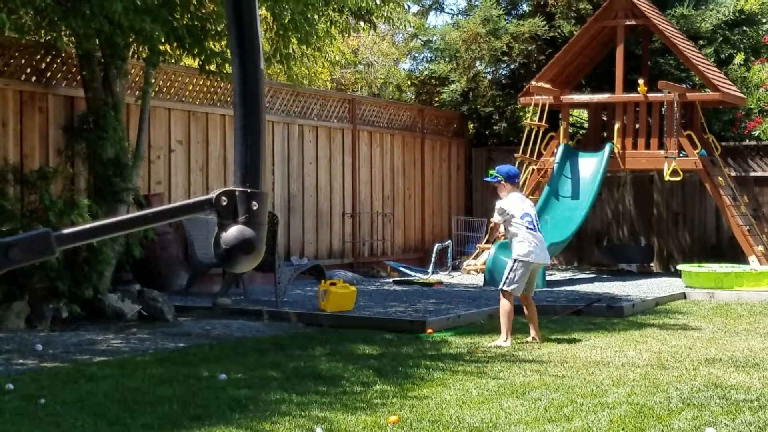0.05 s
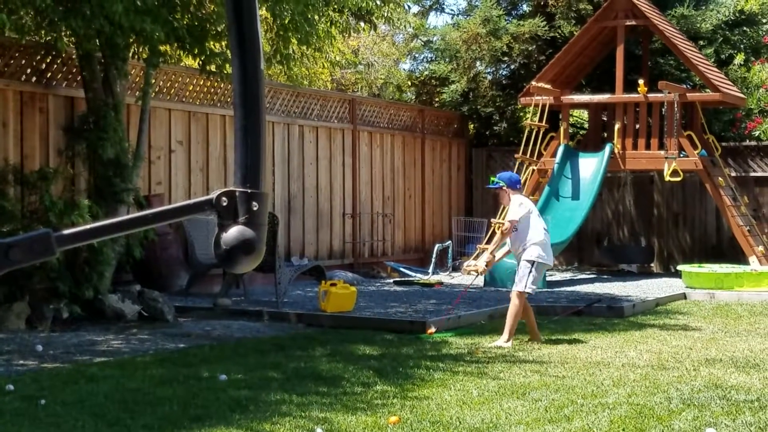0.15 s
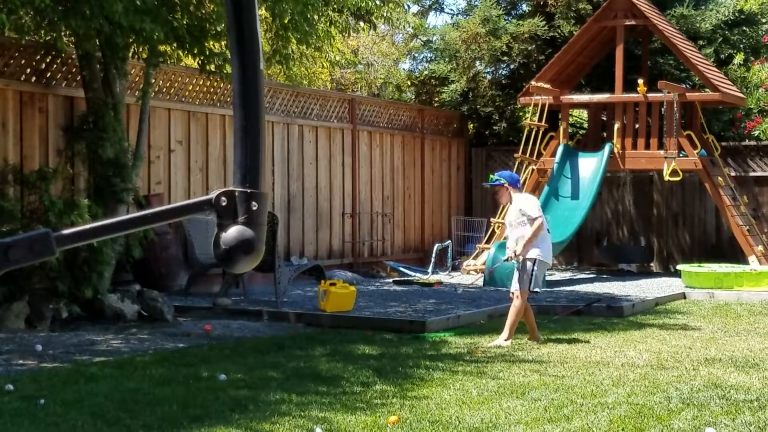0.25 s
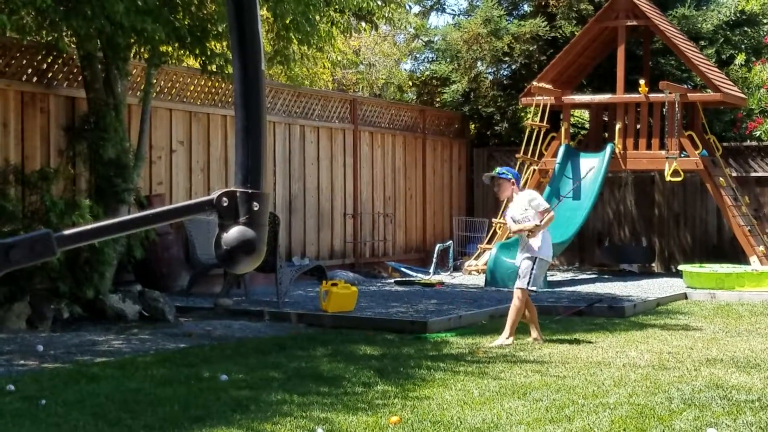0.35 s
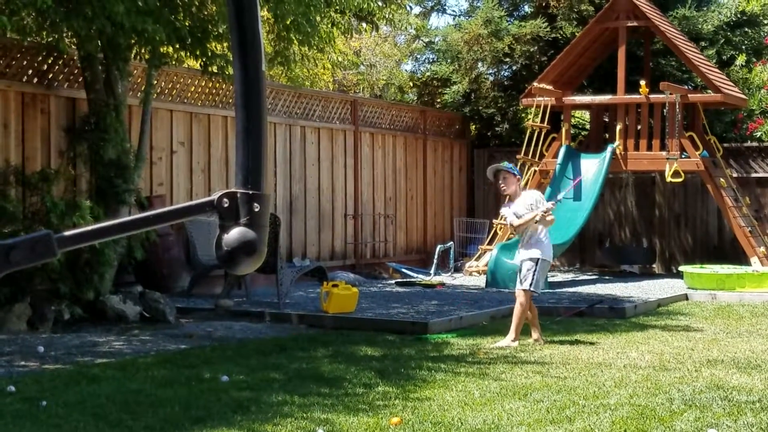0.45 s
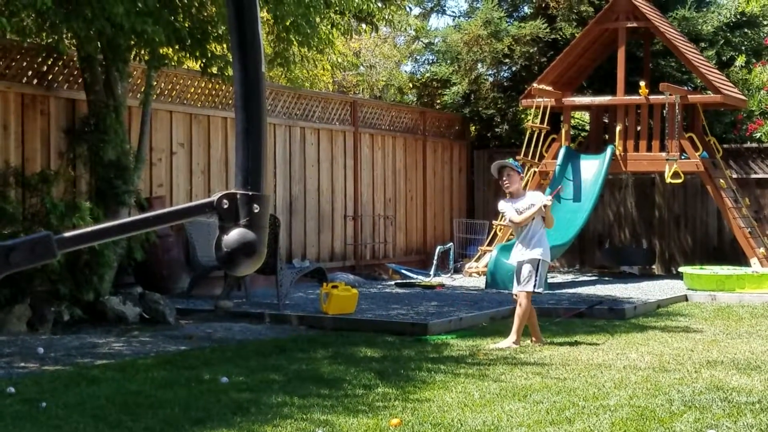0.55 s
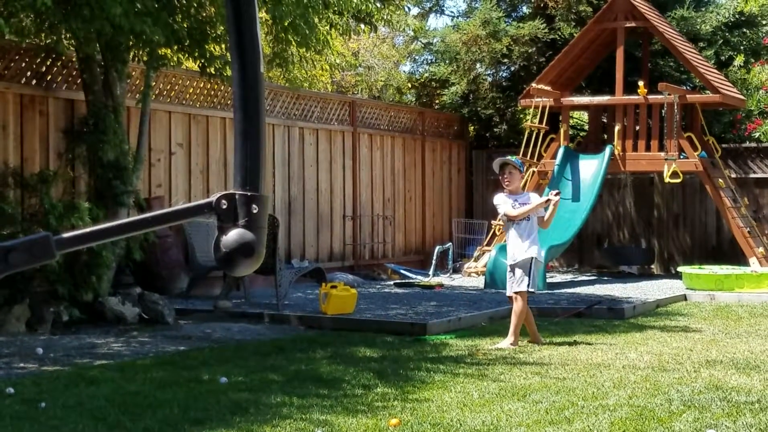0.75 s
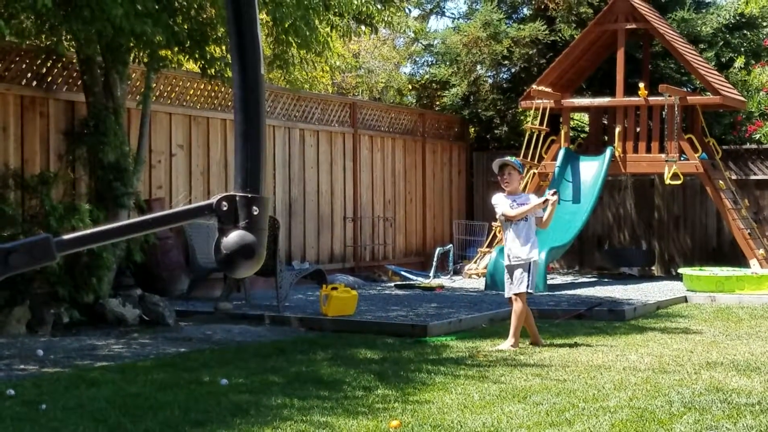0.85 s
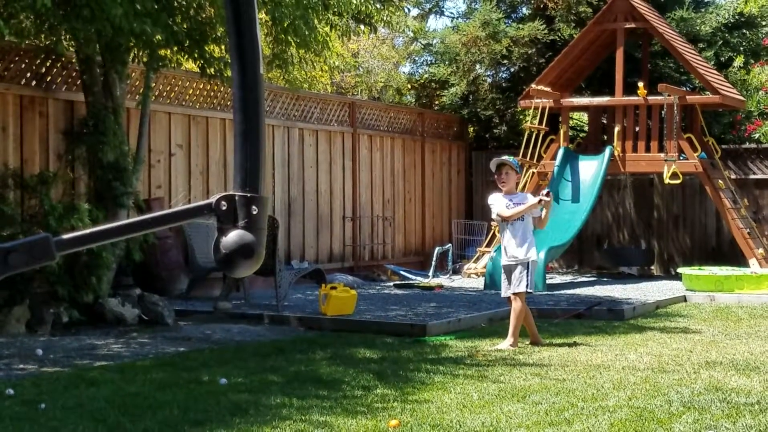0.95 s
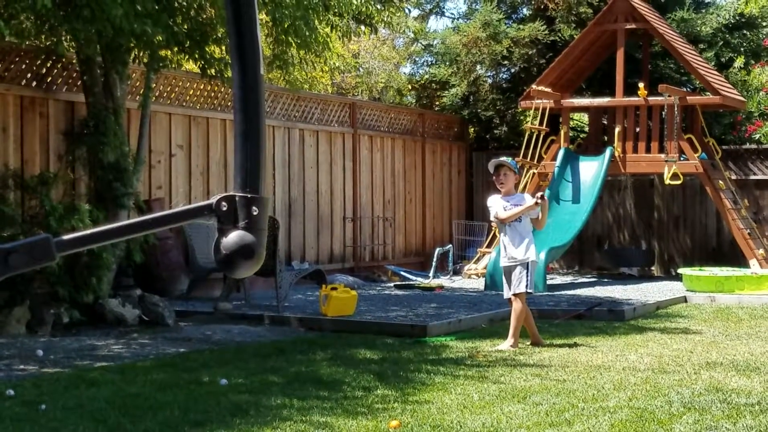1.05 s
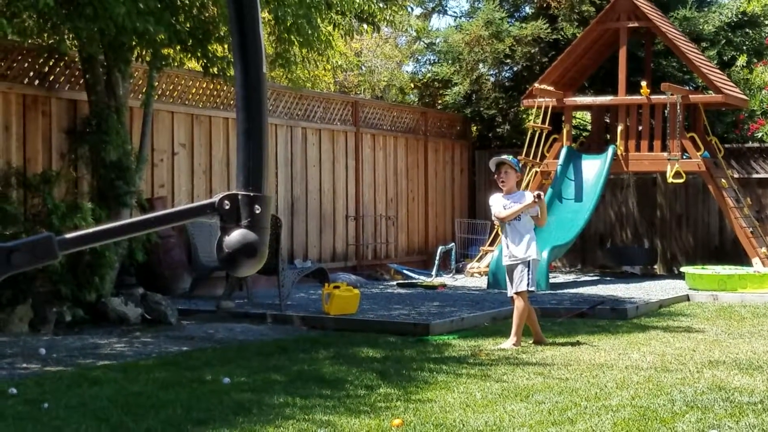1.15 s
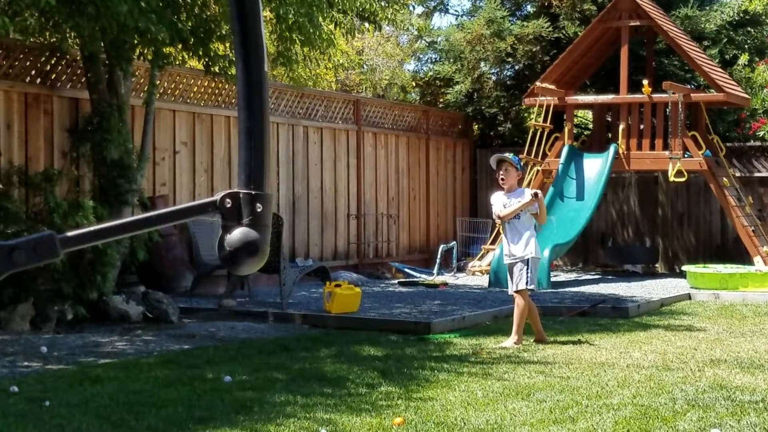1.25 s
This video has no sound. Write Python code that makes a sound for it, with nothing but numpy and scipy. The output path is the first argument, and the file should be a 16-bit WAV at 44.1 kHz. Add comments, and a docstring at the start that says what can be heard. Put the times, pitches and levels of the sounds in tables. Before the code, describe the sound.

One loud, hollow crack of a bat hitting a ball bounces off a garden fence. Much quieter and farther off, the ball rustles through foliage, clatters on wood and lands softly, with a faint outdoor rumble underneath.

```python
"""A hollow ball, batted by a child in a fenced backyard, gives a double thump with a crack and a scuff.
The impact excites damped resonances, and fence and house reflect the sound. The ball then brushes
leaves and twigs, knocks on wooden boards, which ring in their normal modes, and drops through the
foliage to the ground. A low neighbourhood rumble lies underneath."""
import sys
import numpy as np
from scipy import signal
from scipy.fft import rfft, irfft, next_fast_len
from scipy.io import wavfile
from scipy.ndimage import map_coordinates

SR = 44100
rng = np.random.default_rng(int(sys.argv[2]) if len(sys.argv) > 2 else 0)


def persist_wave(psi):
    """Save psi, clipped to +-1, as 16-bit WAV."""
    counts = np.round(np.clip(psi, -1, 1) * 32767).astype(np.int16)
    wavfile.write(sys.argv[1], SR, np.atleast_2d(counts).T)


N = 57330

# spectrum of the neighbourhood rumble (f/Hz, level/dB)
RUMBLE_SPECTRUM = [(15, -46), (25, -25), (44, -9.5), (79, -11), (100, -5.5), (118, 1), (145, -8.5),
                   (190, -7), (235, -8), (290, -13.5), (445, -18), (630, -17), (870, -18.5), (2000, -28.5),
                   (3530, -36), (7700, -45.5), (15500, -38)]
# hollow resonances of bat and ball (t/s, f/Hz, peak level/dB, time to peak/s)
THUMPS = [(.2361, 587, -17, 0.0017), (.2431, 211, -20, 0.0043), (.2458, 606, -14.5, 0.0014),
          (.2425, 127, -57, 0.0027)]
# cracks of the blow and their reflections off the walls (t/s, level/dB, T60/s, left-right/dB)
CRACKS = [(0.2372, -36, 0.035, -8.5), (0.2431, -20.5, 0.014, 3), (0.2554, -23, 0.0054, -2.5),
          (0.286, -24.5, 0.0089, 10), (0.292, -25.5, 0.023, -10.5), (.298, -31.5, 0.042, 6.5),
          (.319, -39.5, 0.045, -4), (0.334, -47.5, .04, -14)]
CRACK_SPECTRUM = [(60, -38), (300, -9.5), (700, 1), (1200, -3.5), (1900, 1), (2400, -9), (3050, -23.5),
                  (6000, -44), (15500, -31)]  # (f/Hz, level/dB)
# scuff of ball on bat, and its scatter (t/s, level/dB, rise/s, T60/s)
SCUFFS = [(0.235, -37.5, 0.0011, 0.12), (.2406, -27, .0015, 0.024), (0.245, -42, 0.0016, 0.28)]
SCUFF_SPECTRUM = [(500, 5.5), (2000, -7.5), (3800, -1), (5500, -4.5), (8000, -3.5), (9400, 1),
                  (12500, -5.5), (15000, -5)]  # (f/Hz, level/dB)
# yard reverberation after the blow (t/s, level/dB, rise/s, T60/s)
YARD_REVERB = [(0.248, -25.5, 0.0062, 0.27), (0.282, -33.5, 0.0015, 0.26)]
YARD_SPECTRUM = [(40, -36), (80, -19), (130, -6), (180, 3), (280, 1.5), (400, 0), (560, -6), (740, -8),
                 (1000, -1.5), (1400, -13), (2100, -10), (3000, -23.5), (6000, -33), (15500, -49)]  # (f/Hz, level/dB)
# late echo from neighbouring gardens (f/Hz, level/dB)
ECHO_SPECTRUM = [(60, -48), (150, 7), (400, -10.5), (750, -0.5), (1100, -3), (1400, -5), (2100, -2),
                 (2500, -10.5), (3050, -20), (6000, -30.5), (15500, -36)]
# brushed leaves (t/s, level/dB, rise/s, T60/s)
RUSTLES = [(0.825, -58, 0.002, 0.69), (0.919, -49, 0.00087, 0.16), (0.978, -42.5, 0.013, 0.17),
           (.991, -46.5, 0.0023, 0.12), (1.002, -54, 0.0024, 0.41), (1.255, -64.5, 0.011, 0.22)]
LEAF_SPECTRUM = [(300, -37), (1500, 3), (2100, 11), (2750, 8), (3300, 1), (4800, -0.5), (7000, -7.5),
                 (9500, -4), (12500, -4.5), (15000, -3)]  # (f/Hz, level/dB)
# struck twigs (t/s, level/dB, T60/s)
TWIGS = [(0.8295, -48, 0.088), (.8445, -57, 0.086), (0.9892, -50, 0.094)]
TWIG_SPECTRUM = [(300, -26), (1000, -5), (1800, -3), (2080, 5.5), (2300, -1), (2700, -1), (3050, -11),
                 (4600, -7), (7000, -16), (15000, -8)]  # (f/Hz, level/dB)
# impacts on wood (t/s, level/dB, relative crack level/dB, left-right/dB)
KNOCKS = [(.9112, -39.5, 7, 0), (0.9208, -38, 2.5, 2), (.939, -38.5, -9, -0.5), (.992, -53, 5, 5),
          (1.018, -50.5, -7, -8)]
# normal modes of the boards (f/Hz, relative level/dB, T60/s)
BOARD_MODES = [(191, -4, 0.21), (252.3, 9, 0.077), (307, 2, .2), (393.7, -5, 0.32), (502.6, 1, 0.16),
               (609.6, -4, 0.14), (764, -4.5, 0.067), (1479, 6, 0.058), (1586, -9, 0.096),
               (2000, -26, 0.043), (2400, -6, 0.024), (2810, -6.5, 0.11), (3100, -13, 0.12),
               (4200, -21, 0.036)]
# contact crack and reverberation of a knock (f/Hz, level/dB)
KNOCK_CRACK_SPECTRUM = [(60, 7), (150, 9), (450, 3.5), (700, -7), (1100, -12), (1500, 8), (1850, -4.5),
                        (2400, 5), (2800, 1), (3450, -18), (4100, -7), (5300, -22), (9000, -19),
                        (15000, -23)]
KNOCK_REVERB_SPECTRUM = [(60, -15), (150, 2), (400, 1), (620, -1.5), (850, -2.5), (1150, -6.5), (1500, -4),
                         (1800, -6.5), (2300, -12), (2800, -12), (3400, -21), (6000, -25.5), (15500, -37)]
# thuds on the ground, then a faint ring (t/s, f/Hz, peak level/dB, time to peak/s)
THUDS = [(0.97, 114.2, -46, 0.025), (1.024, 111.7, -50, 0.032)]
RINGS = [(1.125, 897, -60, 0.033)]
# likeness of the left and right channels (f/Hz, coherence)
COHERENCE = [(60, 1), (200, 0.94), (500, 0.66), (1000, 0.12), (2000, 0.083), (5000, 0.05), (15000, 0.03)]
# channel balance (f/Hz, left-right/dB)
BALANCE = [(60, -3), (200, -1.6), (600, -1.5), (1200, -3.5), (2300, -1.5), (4400, 1.7), (15000, 1.5)]


def amp(db):
    """Amplitude ratio of a level in decibels."""
    return 10 ** (np.asarray(db) / 20)


def unit_rms(x):
    """Normalisation to an rms of 1."""
    return x / np.sqrt(np.mean(x ** 2) + 1e-20)


def curve_at(points, hz):
    """Interpolation of (f/Hz, value) points on a logarithmic frequency axis."""
    f, values = np.transpose(points)
    return np.interp(np.log(hz + 1), np.log(f + 1), values)


def since(onset):
    """Seconds elapsed since the onset, zero before it."""
    return np.maximum(np.arange(N) / SR - onset, 0)


def pan(db):
    """Left and right gains for an interchannel level difference."""
    return amp(np.array([[db], [-db]]) / 2)


def filtered(x, response):
    """Linear filtering: the spectrum is multiplied by a frequency response."""
    size = next_fast_len(N + SR // 2)
    return irfft(rfft(x, size) * response(np.fft.rfftfreq(size, 1 / SR)), size)[..., :N]


def stereo_angle(hz):
    """Mid-side mixing angle; the cosine of twice this angle is the coherence."""
    return np.arccos(np.clip(curve_at(COHERENCE, hz), -1, 1)) / 2


def noise(spectrum):
    """Partially coherent stereo noise of rms 1, near mono in the bass and wide in the treble."""
    def response(hz):
        angle = stereo_angle(hz)
        return amp(curve_at(spectrum, hz)) * [np.cos(angle), np.sin(angle)]
    mid, side = filtered(rng.standard_normal((2, N)), response)
    return unit_rms(np.array([mid + side, mid - side]))


def burst(spectrum, onset, db, rise, t60):
    """Coloured noise with exponential build-up and decay."""
    t = since(onset)
    return noise(spectrum) * (1 - np.exp(-t / rise)) * amp(db - 60 * t / t60)


def resonance(onset, hz, db, time_to_peak):
    """A damped oscillator, softly driven: its amplitude builds to a peak and dies away."""
    t = since(onset)
    u = t / time_to_peak
    return -amp(db) * (u * np.exp(1 - u)) ** 2 * np.sin(2 * np.pi * hz * t)


def minimum_phase(spectrum, size=2048):
    """Causal impulse response of unit energy, obtained by folding the cepstrum."""
    gain = amp(curve_at(spectrum, np.fft.rfftfreq(size, 1 / SR)))
    cepstrum = irfft(np.log(gain))
    cepstrum[1:size // 2] *= 2
    cepstrum[size // 2 + 1:] = 0
    response = irfft(np.exp(rfft(cepstrum)))
    return response / np.linalg.norm(response)


def impact(spectrum, onset, db, t60):
    """Source and filter: a brief noisy force is convolved with a body's impulse response."""
    t = since(onset)
    decay = amp(-60 * t / t60) * (t > 0)
    force = noise([(1, 0), (SR, 0)]) * decay  # flat spectrum
    vibration = signal.fftconvolve(force, minimum_phase(spectrum)[None], axes=1)[:, :N]
    return amp(db) * unit_rms(vibration) * np.sqrt(np.mean(decay ** 2))


def neighbourhood():
    """Stationary background noise: distant rumble and faint hiss."""
    return noise(RUMBLE_SPECTRUM) * amp(-56.5)


def bat():
    """Impact excitation: bat and hollow ball resonate, the contact cracks and friction scuffs."""
    thump = sum(resonance(*row) for row in THUMPS)
    crack = sum(pan(lr) * impact(CRACK_SPECTRUM, onset, db, t60) for onset, db, t60, lr in CRACKS)
    scuff = sum(burst(SCUFF_SPECTRUM, *row) for row in SCUFFS)
    return thump + crack + scuff


def yard():
    """Reverberation: fence and house scatter the blow; longer paths from other gardens arrive later."""
    near = sum(burst(YARD_SPECTRUM, *row) for row in YARD_REVERB)
    return near + burst(ECHO_SPECTRUM, onset=0.31, db=-39.5, rise=0.0064, t60=0.52)


def foliage(grain_db=3, grain_hz=700):
    """Friction and small impacts: leaves rustle and twigs tick, grainy with random amplitude modulation."""
    leaves = sum(burst(LEAF_SPECTRUM, *row) for row in RUSTLES)
    twigs = sum(burst(TWIG_SPECTRUM, onset, db, rise=0.0012, t60=t60) for onset, db, t60 in TWIGS)
    knots = rng.standard_normal(int(N * grain_hz / SR) + 4)
    grain = map_coordinates(knots, [np.arange(N) * grain_hz / SR])
    return (leaves + twigs) * unit_rms(amp(grain_db * grain))


def boards(onset, count=5, mistuning=0.0248, rise_cycles=0.74):
    """Modal superposition: each mode differs slightly in frequency by board, and in phase by ear."""
    out = np.zeros((2, N))
    ringing = slice(int(onset * SR), int((onset + 0.3) * SR))
    t = since(onset)[ringing, None]
    for hz, db, t60 in BOARD_MODES:
        detune, start_phase, spread = rng.standard_normal((3, count))
        phase = 2 * np.pi * (hz * (1 + mistuning * detune) * t + start_phase)
        ear_shift = stereo_angle(hz) * spread
        envelope = amp(db - 60 * t / t60) * (1 - np.exp(-t * hz / rise_cycles)) / np.sqrt(count)
        out[:, ringing] += [(envelope * np.sin(phase + side * ear_shift)).sum(axis=1) for side in (1, -1)]
    return out


def knocks():
    """Impulsive excitation: each contact cracks, sets the boards ringing and reverberates in the yard."""
    out = np.zeros((2, N))
    for onset, db, crack_db, lr in KNOCKS:
        crack = impact(KNOCK_CRACK_SPECTRUM, onset, crack_db, t60=0.03)
        reverb = burst(KNOCK_REVERB_SPECTRUM, onset, db=-10, rise=0.013, t60=0.67)
        out += amp(db) * pan(lr) * (amp(-6) * boards(onset) + crack + reverb)
    return out


def landing():
    """A soft impact excites only low frequencies: the ball thuds on the ground."""
    return sum(resonance(*row) for row in THUDS)


def faint_ring():
    """A single damped resonance lingers after the landing."""
    return sum(resonance(*row) for row in RINGS)


def scene():
    """Linear superposition of the ball's sounds and the background."""
    return bat() + yard() + knocks() + foliage() + landing() + faint_ring() + neighbourhood()


def record(dry, low_cut_hz=48, top_hz=15900):
    """Band-limited microphone response, favouring the right in bass and middle, the left in the treble."""
    def response(hz):
        return amp(curve_at(BALANCE, hz) * np.array([[1], [-1]]) / 2) * (hz < top_hz)
    low_cut = signal.butter(2, low_cut_hz, "highpass", fs=SR, output="sos")
    return filtered(signal.sosfilt(low_cut, dry), response)


dry = scene()
out = record(dry)
persist_wave(out)
```